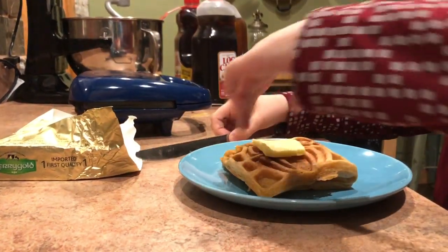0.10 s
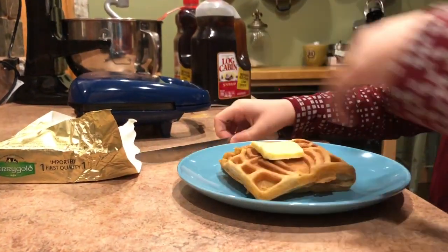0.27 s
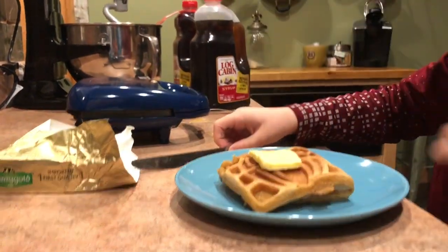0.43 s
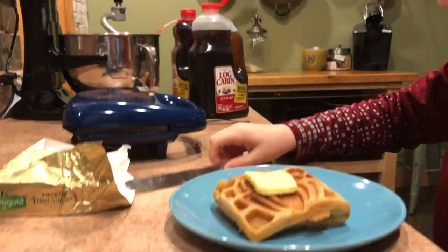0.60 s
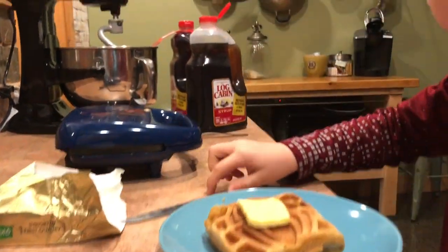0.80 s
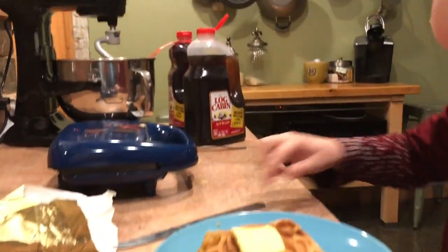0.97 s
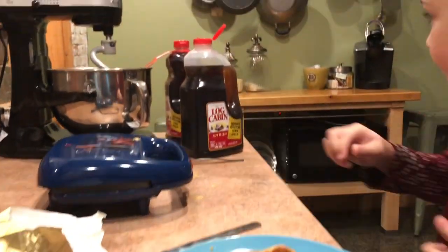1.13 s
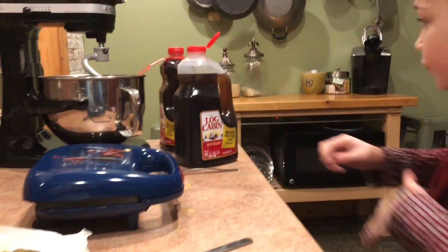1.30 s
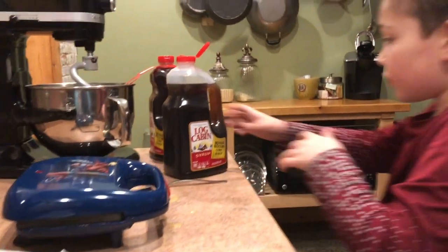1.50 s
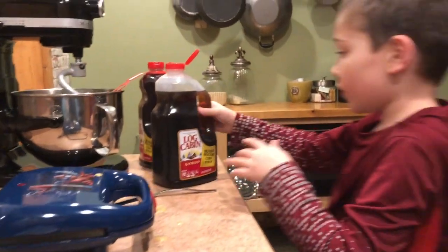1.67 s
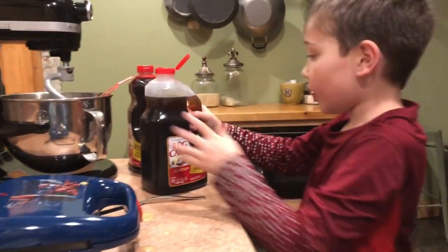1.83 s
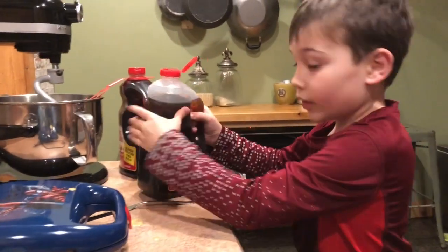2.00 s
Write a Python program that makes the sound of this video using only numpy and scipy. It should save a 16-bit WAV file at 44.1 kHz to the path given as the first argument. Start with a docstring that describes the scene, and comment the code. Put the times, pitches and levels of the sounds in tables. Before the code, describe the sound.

Knife knocks off a plate rim and drops on a hard countertop, in a quiet humming kitchen.

```python
"""A fridge hums in a quiet room and fingers rustle; then a steel knife is lifted off a plate rim,
knocked, slid and dropped on a hard kitchen counter. The hum dips and wavers from about 0.8 to 1.3 s.
Blows excite decaying sine modes of counter, plate and knife; dense random clicks make the slide and rustle.
The hum is two sines with two fuzzy noise bands; shaped noise is the air; echoes and a tail are the room."""
import sys
import numpy as np
from scipy import signal
from scipy.fft import rfft, irfft
from scipy.io import wavfile

SR = 44100
rng = np.random.default_rng(int(sys.argv[2]) if len(sys.argv) > 2 else 0)


def dump_mix(stems):
    """Bounce the given channels to the path in sys.argv[1] as a 16-bit WAV at rate SR."""
    frames = np.atleast_2d(stems).T  # one column per channel
    limited = np.clip(frames, -1, 1)  # hard clip at full scale
    pcm = np.round(limited * 32767).astype(np.int16)
    wavfile.write(sys.argv[1], SR, pcm)


def makeup_ratio(level_db):
    """Linear amplitude ratio for a level in decibels (20 dB per factor of ten)."""
    decades = np.asarray(level_db, float) / 20
    return 10 ** decades


N = 92610


def evened(x):
    """Scales to power 1."""
    return x / np.sqrt(np.mean(x ** 2) + 1e-20)


def read(points, hz):
    """Reads a spectral curve, linear in log frequency."""
    f, value = np.transpose(points)
    return np.interp(np.log(hz + 1), np.log(f + 1), value)


def follow(rows, axis=1, outside=None):
    """Reads one column of a time curve at every sample."""
    rows = np.array(rows)
    return np.interp(np.arange(N) / SR, rows[:, 0], rows[:, axis], outside, outside)


def colour(x, points):
    """Shapes x by a spectrum."""
    gain = makeup_ratio(read(points, np.fft.rfftfreq(len(x), 1 / SR)))
    return irfft(rfft(x) * gain, len(x))


def resonate(x, hz, width_hz):
    """Two-pole resonance, output power 1."""
    r = np.exp(-np.pi * width_hz / SR)
    return evened(signal.lfilter([1], [1, -2 * r * np.cos(2 * np.pi * hz / SR), r * r], x))


def ring(modes, tilt_db=0., spread_db=0., wobble=0., size=SR // 2):
    """Decaying sine modes after one tap; where it is struck shifts their balance."""
    wobble_hz = 40
    hz, db, t60_s = np.transpose(modes)[:, :, None]
    t = np.arange(size) / SR
    luck = rng.standard_normal(hz.shape)
    flutter = 0
    if wobble:
        slow = signal.butter(2, wobble_hz, fs=SR, output="sos")
        flutter = evened(signal.sosfilt(slow, rng.standard_normal((len(hz), size))))
    balance_db = spread_db * luck + tilt_db * np.log2(hz / 2000)
    height = makeup_ratio(db + balance_db - 60 * t / t60_s)
    phase = 2 * np.pi * hz * t + np.pi * wobble * flutter
    return (height * np.sin(phase)).sum(0)


# counter modes: (frequency [Hz], level before tilt [dB], t60 [s])
COUNTER_MODES = [(474, -29, 0.098), (623, -11.5, 0.023), (820, -9, 0.017), (980, -7.5, 0.019),
                 (1140, 0.5, 0.005), (1326, -9, 0.022), (1626, 2, 0.011), (1800, -0.5, 0.017),
                 (2203, 8, 0.0096), (2490, 4, 0.014), (2885, 8, 0.0034), (3060, 4, 0.0075),
                 (3340, 2.5, 0.006), (4860, -7, 0.0057), (6000, -30, .008)]


def counter_ring(tilt_db, spread_db=0., size=SR // 2):
    """Short, heavily damped answer of the counter; tilt in dB per octave about 2 kHz."""
    return ring(COUNTER_MODES, tilt_db, spread_db, size=size)


def blows(table, modes, wobble):
    """Each blow: a chattering tap into the counter, a bright noise crack, and the object ringing on."""
    chatter_level, soft_above_hz = .22, 4500
    crack_over_ring_db, crack_t60_s = 7, 0.0069
    out = np.zeros(N + SR)
    t = np.arange(SR // 10) / SR
    # the contact lasts long enough to dull the knock
    soft = signal.butter(2, soft_above_hz, fs=SR, output="sos")
    for s, db, tilt_db, chatter_t60_s, ring_db in table:
        chatter = chatter_level * rng.standard_normal(len(t)) * makeup_ratio(-60 * t / chatter_t60_s)
        chatter[0] = 1
        body = counter_ring(tilt_db, spread_db=2.0, size=len(t))
        knock = signal.sosfilt(soft, signal.fftconvolve(body, chatter)[:len(t)])
        crack_gain = makeup_ratio(ring_db + crack_over_ring_db - 60 * t / crack_t60_s)
        crack = crack_gain * rng.standard_normal(len(t))
        start = round(s * SR)
        out[start:][:len(t)] += makeup_ratio(db) * (knock / abs(knock).max() + crack)
        out[start:][:SR // 2] += makeup_ratio(db + ring_db) * ring(modes, spread_db=2.5, wobble=wobble)
    return out[:N]


# knocks with plate ring: (time [s], knock peak [dB], tilt [dB/octave], chatter t60 [s], ring re knock [dB])
PLATE_BLOWS = [(.3293, -18, -13, 0.022, -47), (.346, -35, -21, 0.028, -45), (.360, -26, -17, 0.014, -50),
               (.4417, -5, -11, 0.0054, -31), (.4432, -6, -6, 0.0065, -48), (.4447, -9.5, -5.5, 0.012, -47),
               (.462, -17, 0, 0.042, -26), (.466, -17, 5, 0.048, -36), (.512, -29.5, -9, 0.072, -35),
               (.560, -37, -1, 0.018, -48), (.6195, -35, -0.5, 0.045, -26)]
# plate mode frequencies: (frequency [Hz])
PLATE_HZ = [4732, 5120, 6352, 8274, 9566, 10270, 15300]
# plate modes, same order: (relative level [dB], t60 [s])
PLATE_MODES = [(-20, 0.13), (-3.5, 0.17), (-12, .2), (-13, 0.15), (-8, 0.33), (-21, 0.054), (-27, 0.035)]


def plate_blows():
    """Knocks on the counter that leave the plate's steady modes ringing."""
    return blows(PLATE_BLOWS, np.c_[PLATE_HZ, PLATE_MODES], wobble=0)


# knocks with knife ring: (time [s], knock peak [dB], tilt [dB/octave], chatter t60 [s], ring re knock [dB])
KNIFE_BLOWS = [(.7842, -19, -14, 0.033, -27), (.7906, -4, 6, 0.015, -47), (.7965, -18, 16, 0.015, -22),
               (.8025, -24, 16, .02, -19), (.810, -23.5, 21, 0.056, -16.5), (.839, -11, 6, 0.035, -45),
               (.8412, -14, 17, 0.013, -44), (.8435, -16.5, -13.5, 0.017, -38)]
# knife mode frequencies: (frequency [Hz])
KNIFE_HZ = [2492, 3801, 4840, 5125, 6363, 6600, 6700, 8280, 8400, 8990, 10250, 11510, 12510, 13680, 14940]
# knife modes, same order: (relative level [dB], t60 [s])
KNIFE_MODES = [(9, 0.092), (6, 0.14), (-13, 0.56), (-2.5, 0.17), (-5, 0.33), (-11, 0.42), (2.5, 0.25),
               (1.5, 0.15), (-1, .15), (0.5, 0.091), (1.5, 0.093), (-2, .1), (-1, 0.11), (-4, 0.13),
               (-1, .1)]
BLADE_WOBBLE = .3  # rms phase flutter, in half turns: contact with the counter unsettles the ring


def knife_blows():
    """Knife hits the counter; contact makes its modes flutter in phase."""
    return blows(KNIFE_BLOWS, np.c_[KNIFE_HZ, KNIFE_MODES], BLADE_WOBBLE)


# blade slides in, then rattles flat:
# (time [s], slip level [dB], blade ring re slips [dB], hiss re slips [dB])
SLIDE = [(.66, -64, -40, -42), (.7, -74, -40, -40), (.73, -54.5, -32, -24), (.754, -38.5, -20, -25),
         (.772, -41, -15, -41), (.781, -43.5, 7.5, -42), (.792, -25.5, -40, -39), (.81, -31.5, 2, -52),
         (.825, -32.5, -17, -42), (.836, -32.5, -26, -33), (.85, -37, -29, -33), (.88, -69, -20, -30),
         (.9, -78, -18, -30)]


def slide():
    """Dense slips of the blade drive the counter and the blade itself."""
    slips = grains(per_s=3500, spread_db=2.0) * makeup_ratio(follow(SLIDE, outside=-120))
    body = counter_ring(tilt_db=1.)
    blade = ring(np.c_[KNIFE_HZ, KNIFE_MODES], wobble=BLADE_WOBBLE)
    blade_drive = slips * makeup_ratio(follow(SLIDE, axis=2))
    out = signal.fftconvolve(slips, body / np.linalg.norm(body))
    out += signal.fftconvolve(blade_drive, blade / np.linalg.norm(blade))
    hiss = makeup_ratio(follow(SLIDE, axis=3)) * slips
    return out[:N] + hiss


def grains(per_s, spread_db):
    """Random clicks of either sign, a few large, power 1."""
    size_db = spread_db * np.minimum(rng.exponential(1, N), 4)
    size = makeup_ratio(size_db) * rng.choice([-1., 1.], N)
    return evened(size * (rng.random(N) < per_s / SR))


# strokes of fingers and cloth:
# (time [s], level before an 8 dB lift [dB], squeak share of skin [0-1], cloth share [0-1])
RUSTLE = [
    [(0.12, -87, 0.4, 0.5), (0.146, -85, 0.4, 0.2), (0.15, -74, 0.5, 0.5), (0.192, -63.5, 0.43, 0.47),
     (0.204, -79, 0.2, 0.3), (0.21, -63, 0.4, 0.7)],
    [(0.21, -59, 0.4, 0.1), (0.226, -46, 0.49, 0), (0.244, -66.5, 0.3, 0), (0.282, -57.5, 0.5, 0),
     (0.3, -72, 0.2, 0.2)],
    [(0.3, -82, 0.3, 0.4), (0.32, -46.5, 0.4, 0.03), (0.33, -51.5, 0.4, 0.15), (0.335, -65, 0.3, 0.2)],
    [(0.335, -64, 0.2, 0), (0.347, -57.5, 0, 0.2), (0.387, -76, 0.2, 0), (0.43, -61, 0.2, 0)],
    [(0.56, -62.5, 0.05, 0), (0.652, -60, 0.05, 0), (0.658, -77, 0.2, 0), (0.718, -74, 0.3, 0.3),
     (0.76, -64, 0.4, 0.2)],
    [(1.05, -70, 0.19, 0.27), (1.134, -76, 0.17, 0.24), (1.14, -85, 0.3, 0.2), (1.16, -86, 0.3, 0.2)],
    [(1.16, -84, 0.5, 0.11), (1.236, -81, 0.7, 0.5), (1.27, -68, 0.5, 0.7), (1.28, -75, 0.4, 0.2)],
    [(1.28, -72, 0.5, 0.12), (1.288, -65, 0.4, 0.15), (1.342, -63.5, 0.08, 0.24), (1.436, -74.5, 0.3, 0.2),
     (1.45, -64, 0.08, 0)],
    [(1.55, -72, 0.2, 0.2), (1.568, -75, 0.2, 0.2), (1.598, -74, 0.18, 0.64), (1.736, -76, 0.28, 0.77),
     (1.78, -79, 0.4, 0.37), (1.94, -81, 0.2, 0.5), (2.028, -73, 0.24, 0.5), (2.052, -75, 0.03, 0.3),
     (2.1, -73, 0.3, 0.6)],
]
# dull skin spectrum: (frequency [Hz], relative density [dB per Hz])
SKIN = [(300, -41), (500, -24), (950, -1.5), (1500, -2), (3000, -11.5), (5500, -18), (8000, -37),
        (16000, -49)]
# thin cloth spectrum: (frequency [Hz], relative density [dB per Hz])
CLOTH = [(2000, -15), (5000, 7), (9000, 4), (14500, -4), (16000, 1)]
# finger squeak resonances: (frequency [Hz], width [Hz], relative level [dB])
SQUEAK = [(950, 140, 3), (1300, 50, 0.5), (5600, 740, 1.5), (7540, 450, -2.5), (11200, 1100, -11.5)]


def rustle():
    """Fine rubbing grains, blended from dull skin, broad squeak resonances and thin cloth."""
    fine = grains(per_s=3000, spread_db=3.5)
    skin = evened(colour(fine, SKIN))
    cloth = evened(colour(fine, CLOTH))
    squeak = evened(sum(makeup_ratio(db) * resonate(fine, hz, width_hz) for hz, width_hz, db in SQUEAK))
    out = np.zeros(N)
    for rows in RUSTLE:
        squeak_share = np.clip(follow(rows, axis=2), 0, 1)
        cloth_share = np.clip(follow(rows, axis=3), 0, 1)
        fingers = (1 - squeak_share) * skin + squeak_share * squeak
        gain = makeup_ratio(follow(rows, outside=-120) + 8.0)
        out += gain * ((1 - cloth_share) * fingers + cloth_share * cloth)
    return out


# fingertip ticks: (time [s], starting level [dB], frequency [Hz], t60 [s])
TICKS = [(.221, -40, 950, 0.054), (0.225, -42, 1300, 0.062), (.346, -41.5, 1800, 0.034),
         (.695, -42.5, 600, 0.087), (0.621, -57, 14300, 0.01), (1.293, -52, 2930, 0.026),
         (1.318, -43.5, 3350, 0.015), (1.321, -49, 1800, 0.014), (1.337, -45, 2520, 0.012)]


def ticks():
    """Small fingertip ticks, each one decaying sine."""
    out = np.zeros(N + SR)
    for s, db, hz, t60_s in TICKS:
        out[round(s * SR):][:SR // 2] += ring([(hz, db, t60_s)])
    return out[:N]


# upper hum line: (time [s], frequency [Hz], rms level [dB])
HUM = [(0.0, 119.6, -40), (0.1, 120.8, -41.5), (0.41, 121.1, -39.5), (0.78, 120.7, -42), (0.82, 115, -50.5),
       (0.84, 114, -49), (0.85, 116.5, -51), (0.86, 116, -82), (0.87, 114.3, -40), (0.89, 112, -59),
       (0.96, 121.7, -51), (1.02, 118.2, -58.5), (1.13, 124.6, -47), (1.2, 116.9, -53.5),
       (1.22, 119.4, -47.5), (1.36, 120.4, -40), (2.02, 120.4, -40.5), (2.1, 119.7, -40)]
# lower hum line: (time [s], rms level [dB])
LOW_HUM = [(0.0, -90), (0.06, -60), (0.26, -71), (0.46, -51), (0.63, -56), (0.84, -52), (1.37, -59.5),
           (2.1, -60)]
# fuzzy low fan band: (time [s], level [dB])
DRONE = [(0.0, -58), (0.09, -50.5), (0.41, -56), (0.47, -36), (0.56, -67), (0.62, -53), (0.74, -59.5),
         (0.79, -43.5), (0.97, -65.5), (1.05, -49.5), (1.14, -58), (1.47, -53.5), (1.54, -63), (2.1, -78)]


def fridge():
    """Mains hum as two sine lines, and two fan bands of twice-resonated noise."""
    low_hum_hz = 60.
    drone_hz, drone_width_hz = 203.8, 23.7
    fan_hz, fan_width_hz, fan_db = 747, 99, -66.5
    hum_phase = 2 * np.pi * np.cumsum(follow(HUM)) / SR + 7 * rng.random()
    low_phase = 2 * np.pi * low_hum_hz * np.arange(N) / SR + 7 * rng.random()
    hum = makeup_ratio(follow(HUM, axis=2)) * np.sin(hum_phase)
    low = makeup_ratio(follow(LOW_HUM)) * np.sin(low_phase)
    drone_noise, fan_noise = rng.standard_normal((2, N))
    drone = resonate(resonate(drone_noise, drone_hz, drone_width_hz), drone_hz, drone_width_hz)
    fan = resonate(resonate(fan_noise, fan_hz, fan_width_hz), fan_hz, fan_width_hz)
    return np.sqrt(2) * (hum + low) + makeup_ratio(follow(DRONE)) * drone + makeup_ratio(fan_db) * fan


# room air spectrum: (frequency [Hz], relative density [dB per Hz])
AIR = [(140, -35), (230, 0), (306, -2.5), (399, -2), (444, -4), (704, -7), (902, -11.5), (1060, -10.5),
       (1840, -17.5), (2960, -19), (16000, -41)]
# low rumble spectrum: (frequency [Hz], relative density [dB per Hz])
RUMBLE = [(25, -42), (45, -26), (70, -0.5), (100, 12), (140, 13.5), (230, 6.5), (300, -18)]


def air():
    """Steady room air and low rumble, both shaped noise."""
    air_db, rumble_db = -55.5, -55.5
    air_noise, rumble_noise = rng.standard_normal((2, N))
    hush = evened(colour(air_noise, AIR))
    rumble = evened(colour(rumble_noise, RUMBLE + [(500, -90)]))
    return makeup_ratio(air_db) * hush + makeup_ratio(rumble_db) * rumble


# reverberation time: (frequency [Hz], t60 [s])
ROOM = [(250, 0.78), (1000, 0.5), (2500, 0.46), (5000, 0.46), (10000, 0.35), (16000, 0.39)]
# early echoes: (delay [s], level [dB])
ECHOES = [(.0035, -14.5), (.0062, -18), (.0085, -19)]


def kitchen(x):
    """A few early echoes, then sparse taps whose bands die at their own speeds."""
    tail_db = -8.5
    taps = np.zeros(SR)
    at = np.arange(400, SR - 20, 20) + rng.integers(0, 20, (SR - 401) // 20)
    taps[at] = rng.choice([-1., 1.], at.shape)
    hz, t, z = signal.stft(taps, SR, nperseg=256)
    decay = makeup_ratio(-60 * t / read(ROOM, hz)[:, None])
    tail = signal.istft(z * decay, SR, nperseg=256)[1]
    tail *= makeup_ratio(tail_db) / np.linalg.norm(tail)
    for s, db in ECHOES:
        tail[round(s * SR)] += makeup_ratio(db)
    return x + signal.fftconvolve(x, tail)[:N]


def scene():
    """Near sounds, thinned and placed in the room, over fridge and air."""
    near = plate_blows() + knife_blows() + slide() + rustle() + ticks()
    # the near sounds carry little below about 430 Hz
    thin = signal.butter(4, 428, "high", fs=SR, output="sos")
    near = signal.sosfilt(thin, near)
    return (kitchen(near) + fridge() + air())[None]


def band_limit(x):
    """A steep low-pass at the top of the band."""
    return signal.sosfilt(signal.butter(12, 16530, fs=SR, output="sos"), x)


def record(dry):
    """Delivers the finished mix."""
    return band_limit(dry)


dry = scene()
out = record(dry)
dump_mix(out)
```